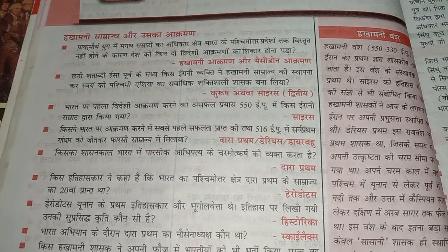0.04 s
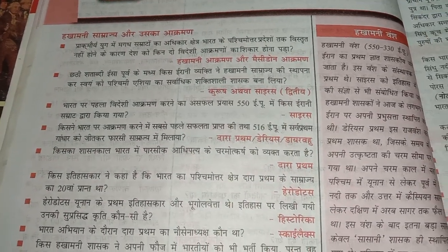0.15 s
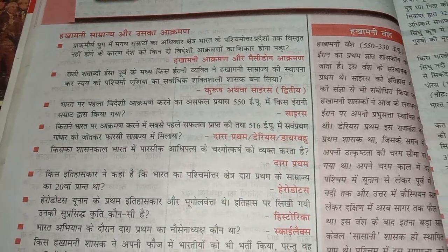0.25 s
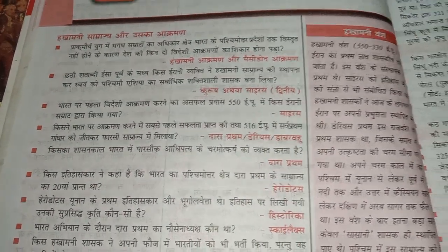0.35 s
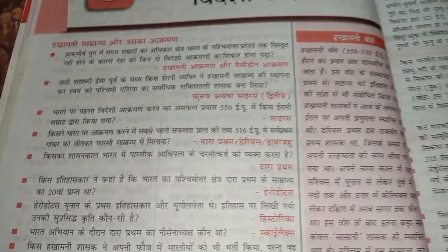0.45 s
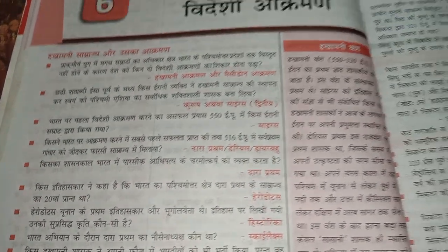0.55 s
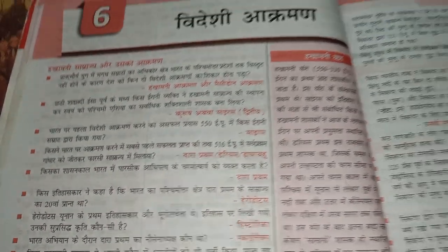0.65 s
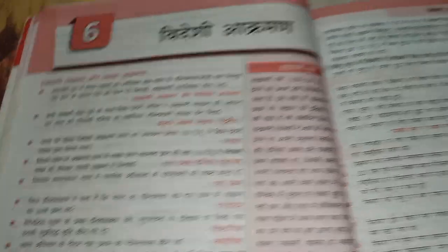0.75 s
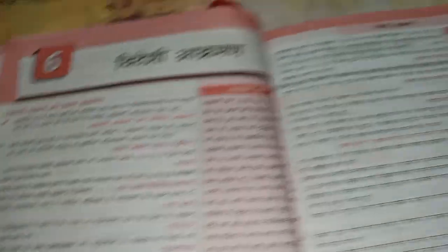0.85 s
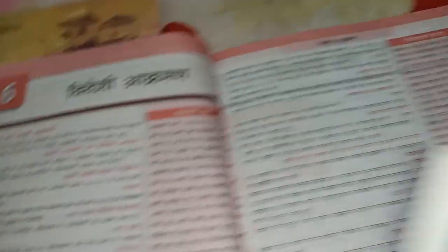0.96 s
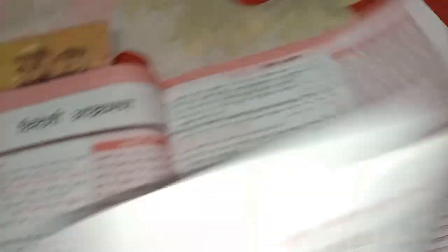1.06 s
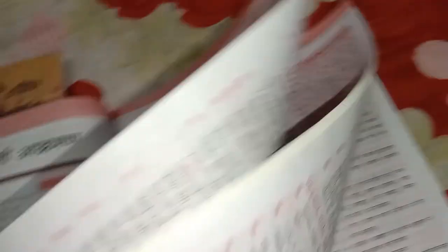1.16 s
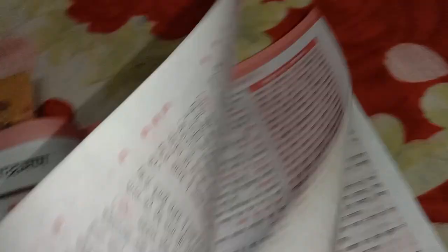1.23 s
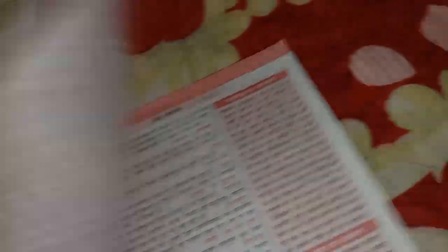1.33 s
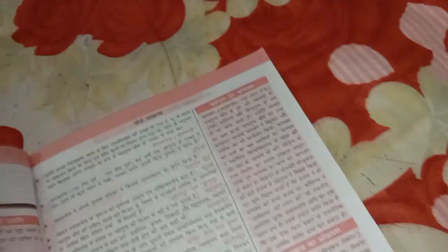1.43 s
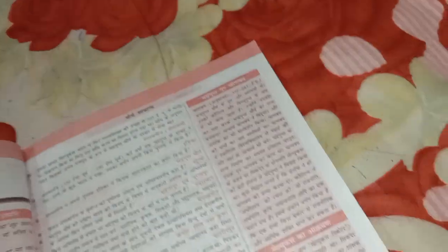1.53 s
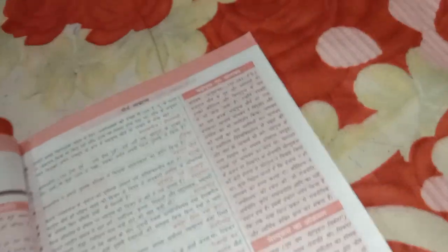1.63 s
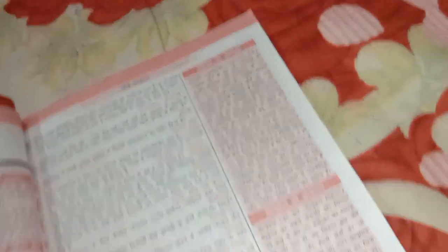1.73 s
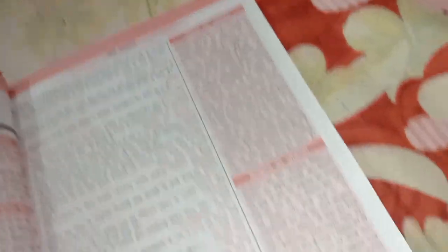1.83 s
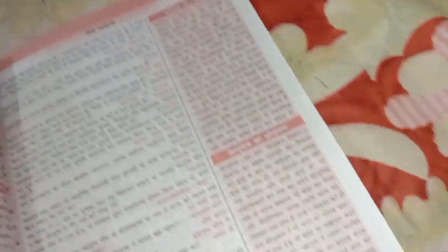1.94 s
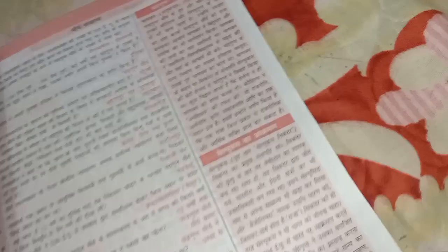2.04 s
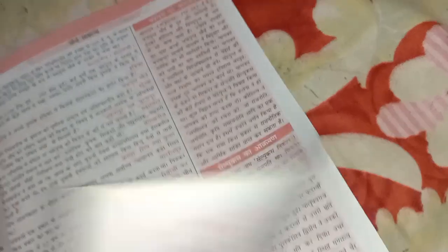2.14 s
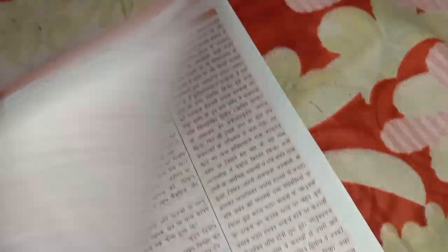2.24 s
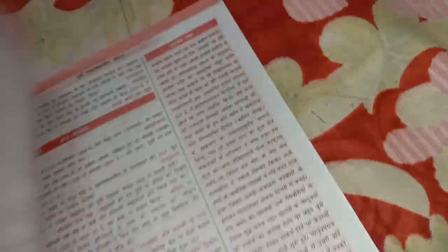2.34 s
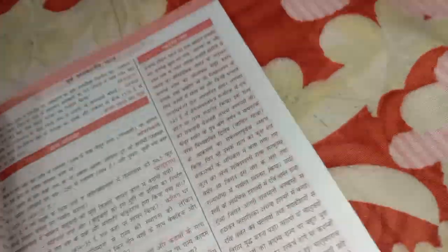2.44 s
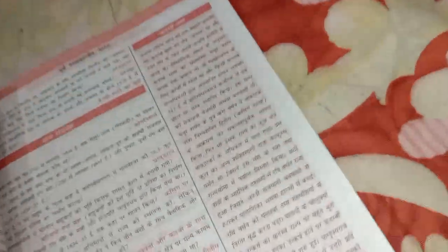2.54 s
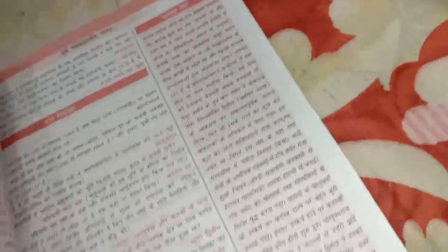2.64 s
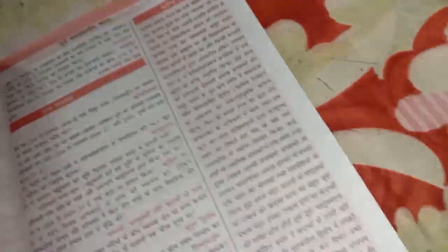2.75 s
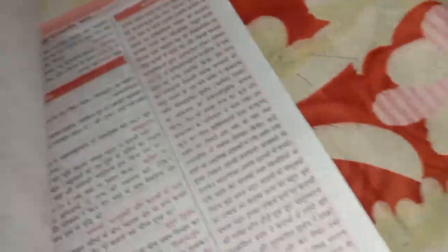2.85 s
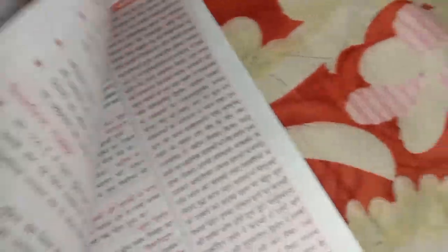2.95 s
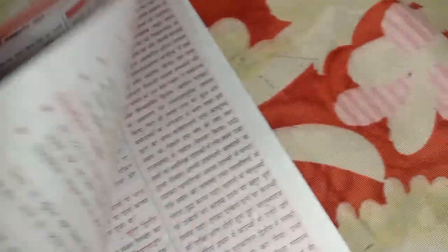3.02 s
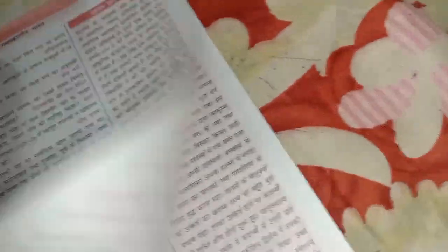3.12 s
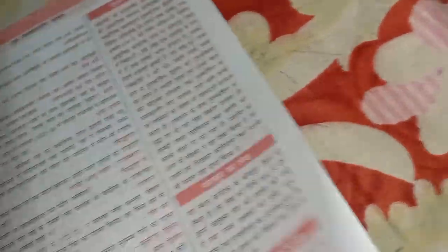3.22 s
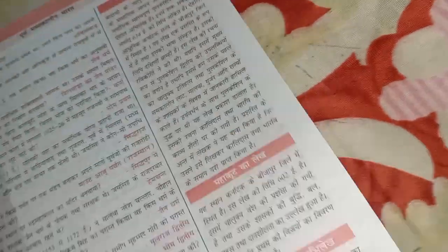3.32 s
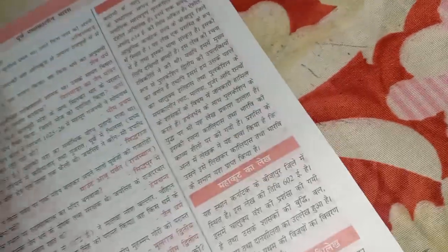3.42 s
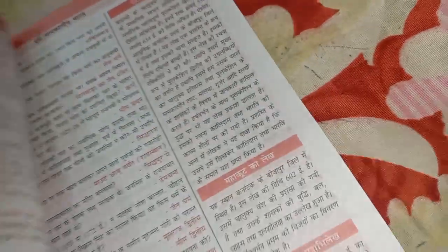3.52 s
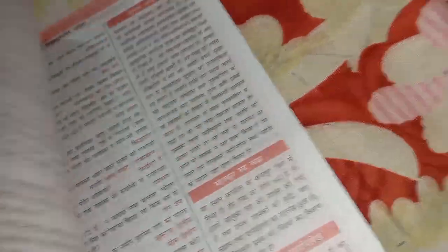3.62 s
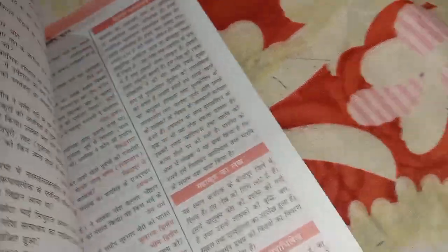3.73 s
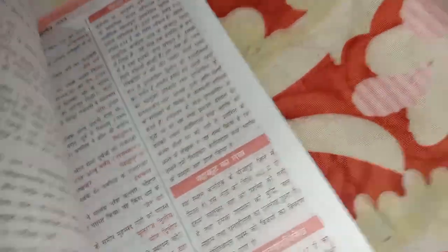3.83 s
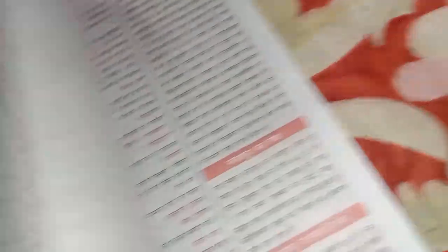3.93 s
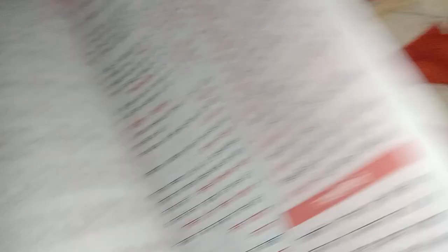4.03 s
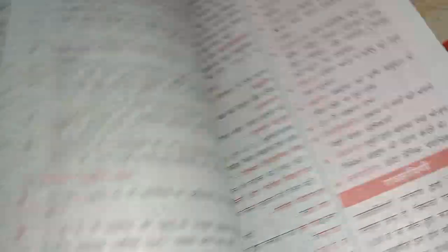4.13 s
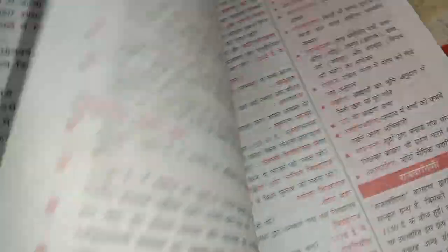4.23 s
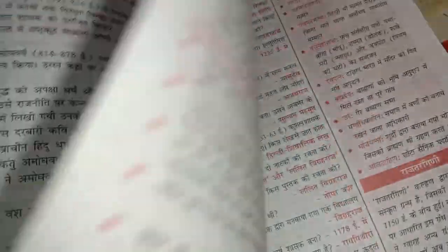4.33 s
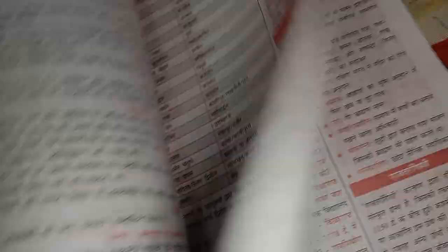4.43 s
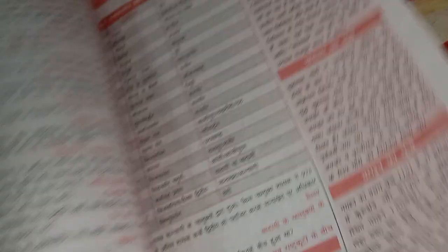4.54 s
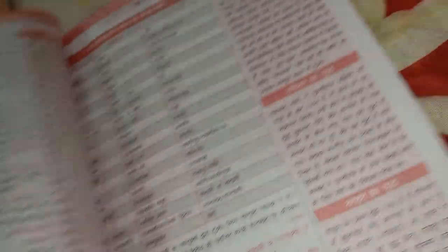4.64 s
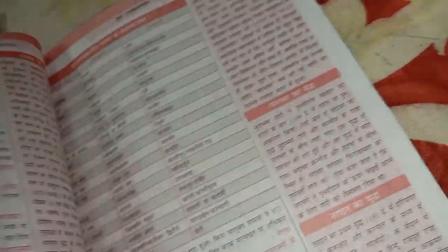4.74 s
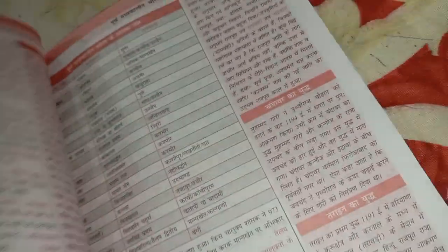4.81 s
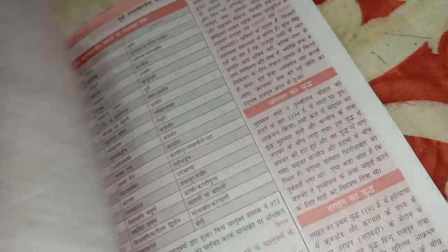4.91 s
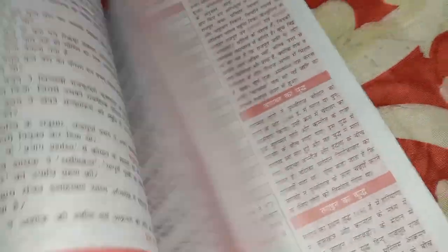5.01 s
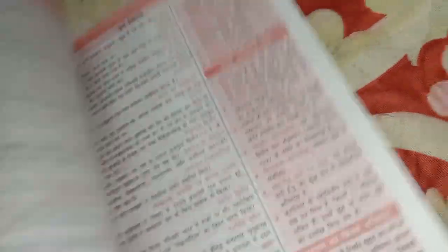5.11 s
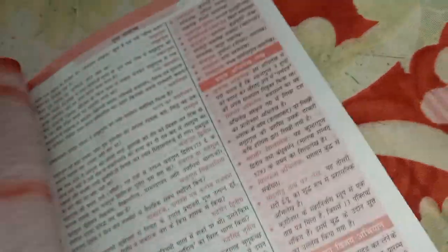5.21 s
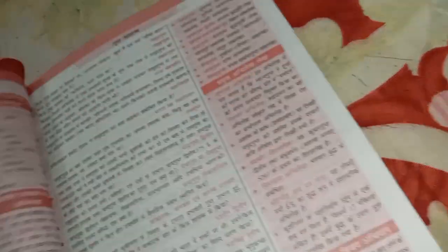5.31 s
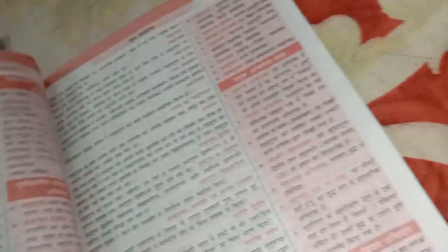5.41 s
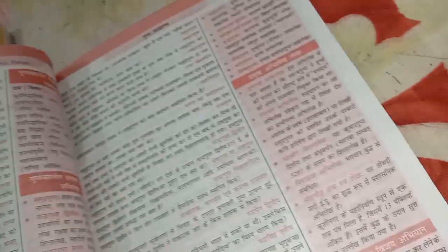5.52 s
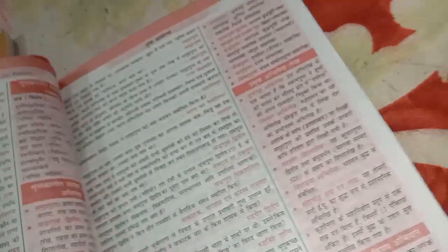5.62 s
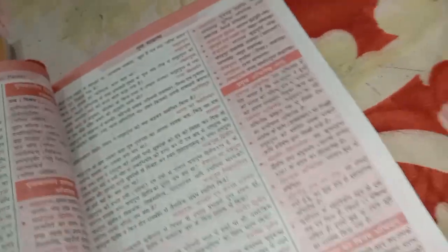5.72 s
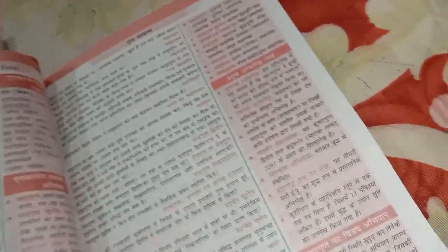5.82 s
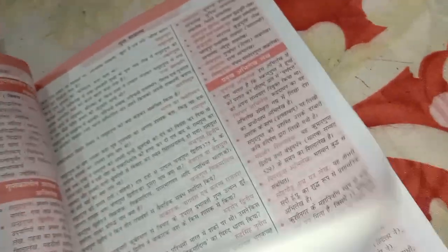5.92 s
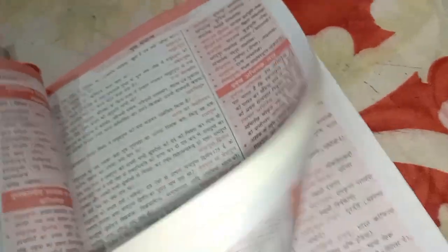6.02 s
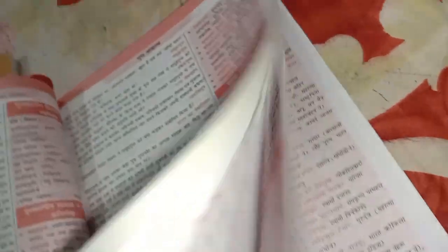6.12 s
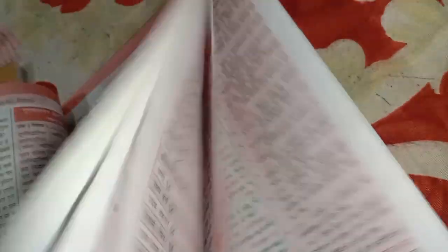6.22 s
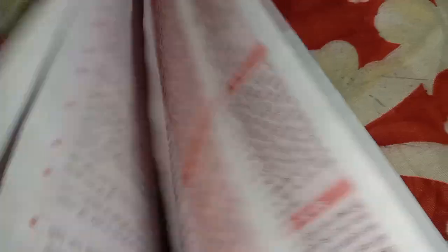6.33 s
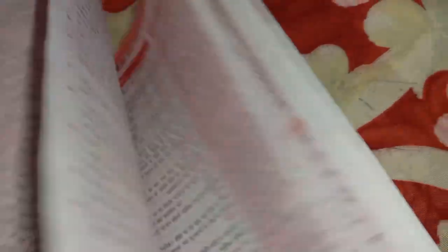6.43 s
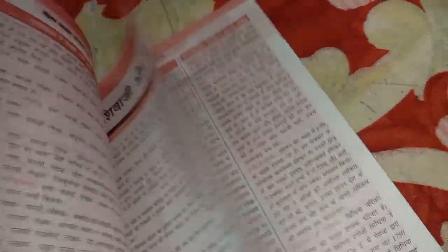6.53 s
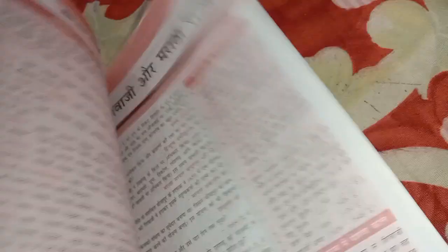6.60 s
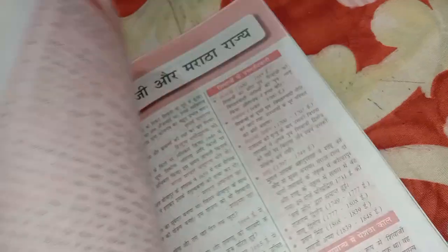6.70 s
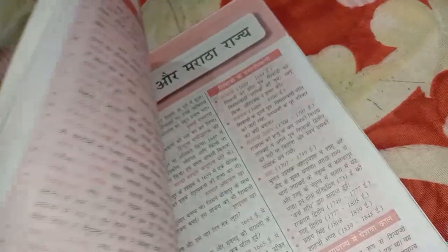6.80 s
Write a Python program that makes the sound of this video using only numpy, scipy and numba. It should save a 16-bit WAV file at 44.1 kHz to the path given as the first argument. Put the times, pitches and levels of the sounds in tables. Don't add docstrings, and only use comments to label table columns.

```python
import sys
import numpy as np
from scipy import signal
from scipy.fft import rfft, irfft
from scipy.io import wavfile
from numba import njit

SR = 44100
rng = np.random.default_rng(int(sys.argv[2]) if len(sys.argv) > 2 else 0)


def gain_from_decibels(decibels):
    exponent = np.asarray(decibels, float) / 20
    return 10 ** exponent


def wav_out(sig):
    wavfile.write(sys.argv[1], SR, np.round(np.clip(np.atleast_2d(sig).T, -1, 1) * 32767).astype(np.int16))


N = 302526

# [f/Hz, level/dB per Hz]
PAPER = [(40, -40), (120, -16), (470, -16), (940, -14), (1400, -8), (3750, -11), (4500, -17), (5500, -16),
         (6200, -24), (7100, -20), (8100, -37), (11400, -38), (13800, -47), (15000, -36)]
SWISH_RELEASE_DB_PER_S = 188


def rms_one(x):
    return x / np.sqrt(np.mean(x ** 2) + 1e-20)


def in_time(steps):
    return np.interp(np.arange(N) / SR * 1000, np.arange(len(steps)), steps)


def colour(x, spectrum, size=4096):
    hz, db = np.transpose(spectrum)
    grid = np.maximum(np.arange(size // 2 + 1) * SR / size, 1)
    cepstrum = irfft(np.log(gain_from_decibels(np.interp(np.log(grid), np.log(hz), db))))
    cepstrum[1:size // 2] *= 2
    cepstrum[size // 2 + 1:] = 0
    return signal.fftconvolve(x, irfft(np.exp(rfft(cepstrum))))[:len(x)]


def band(x, low_hz, high_hz, order=3):
    return signal.sosfilt(signal.butter(order, [low_hz, high_hz], "band", fs=SR, output="sos"), x)


def drift(rate):
    r = np.exp(-40 * np.pi * rate / SR)
    noise = rng.standard_normal(N // 20 + 2002)
    slow = signal.lfilter([1], [1, -2 * r, r * r], noise)[2000:]
    return np.interp(np.arange(N) / 20, np.arange(len(slow)), rms_one(slow))


def resonance(x, hz, width_hz):
    r = np.exp(-np.pi * width_hz / SR)
    turn = np.cos(2 * np.pi * hz / SR)
    return signal.lfilter(np.array([1, 0, -1]) * (1 - r * r) / 2, [1, -2 * r * turn, r * r], x)


@njit
def glide(x, turn, r):
    y = np.zeros(len(x))
    for i in range(2, len(x)):
        y[i] = (1 - r * r) / 2 * (x[i] - x[i - 2]) + 2 * r * turn[i] * y[i - 1] - r * r * y[i - 2]
    return y


def gestures(rows, attack_s, onset_db=4.5, start_db_per_s=117, release_db_per_s=179):
    start_s, length, db = np.transpose(rows)[:3, :, None]
    age = np.arange(N * 1000 // SR + 2) / 1000 - start_s
    climb = onset_db * np.maximum(1 - age / attack_s, 0) + start_db_per_s * np.maximum(-age, 0)
    sag = 7 * np.maximum(age, 0)
    release = release_db_per_s * np.maximum(age - length, 0)
    return age, db - climb - sag - release


def together(db):
    return in_time(np.sqrt(np.sum(gain_from_decibels(db) ** 2, axis=0)))


def fibres(per_s, spread_db, grain_db, flutter_db):
    sizes = gain_from_decibels(spread_db * np.minimum(rng.exponential(1, N), 3)) * rng.choice([-1, 1], N)
    born = rng.random(N) < per_s * gain_from_decibels(6 * drift(25)) / SR
    rub = rng.standard_normal(N) + gain_from_decibels(grain_db) * rms_one(sizes * born)
    return gain_from_decibels(flutter_db * drift(18.0)) * rub


def crinkles(per_s, cycles, spread_db):
    sizes = gain_from_decibels(spread_db * np.minimum(rng.exponential(1, N), 4)) * rng.choice([-1, 1], N)
    born = rng.random(N) < per_s / SR
    pitches, dealt = np.geomspace(1000, 14000, 22), rng.integers(0, 22, N)
    return rms_one(sum(np.sqrt(cycles) * resonance(sizes * born * (dealt == k) + 1e-18, hz, hz / cycles)
                       for k, hz in enumerate(pitches)))


def room(x, noise):
    t = np.arange(noise.shape[1]) / SR
    late = noise * np.minimum(t / 0.0085, 1) ** 2
    layers = [(0.2, 400, 1500), (0.11, 1500, 7200), (0.11, 7200, 7500)]
    tail = sum(band(late * gain_from_decibels(-60 * t / t60), low_hz, high_hz, order=1) for t60, low_hz, high_hz in layers)
    tail = tail / np.linalg.norm(tail, axis=1, keepdims=True)
    return gain_from_decibels(-12) * signal.fftconvolve(x, tail, axes=1)[:, :len(t)]


def quiet_room():
    # [f/Hz, level/dB per Hz]
    quiet_tone = [(24, -73), (50, 3), (140, -4.5), (180, -7), (402, -7), (491, -12.5), (1300, -16.5),
                  (1760, -15), (16000, -38.5)]
    return gain_from_decibels(-79.5) * rms_one(colour(rng.standard_normal(N), quiet_tone))


def bumps():
    # [t/s, peak level/dB, f/Hz, time to fade by 60 dB/s]
    bump_rows = [(0.207, -52.5, 109, 0.067), (0.371, -68, 100, 0.071), (0.534, -64, 107, 0.098),
                 (0.78, -54.5, 227.7, 0.34), (1.925, -53.5, 277, 0.26), (2.129, -60, 106, 0.12),
                 (2.175, -58, 100, 0.083), (2.24, -60, 111, 0.1), (2.392, -44, 430, 0.05),
                 (2.401, -40.5, 235, 0.32), (2.856, -41, 505, 0.015), (2.855, -50, 230, 0.018),
                 (3.005, -39, 466, 0.076), (3.03, -44, 330, 0.14), (3.042, -48, 503, 0.045),
                 (3.439, -55, 104, 0.12), (4.454, -51, 102, 0.09), (4.507, -57, 111, 0.33),
                 (4.589, -62, 91.7, 0.86), (5.752, -51, 566, 0.023), (5.761, -50.5, 186, 0.058),
                 (5.868, -57, 168, 0.065), (6.599, -58.5, 387, 0.98), (6.69, -49.5, 229, 0.079),
                 (6.76, -70, 375, 0.63), (.76, -60, 378, 0.045), (0.824, -49.5, 300, 0.021),
                 (1.008, -60.5, 340, 0.07), (3.029, -50, 152, .1), (1.155, -61, 430, 0.019)]
    out, t = np.zeros(N + 8192), np.arange(8192) / SR
    for start_s, db, hz, t60 in bump_rows:
        swell = 1 - np.exp(-t / .006)
        shape = swell * gain_from_decibels(-60 * (t / max(t60, .02)) ** 1.15)
        rough = rms_one(band(rng.standard_normal(8192), .6 * hz, 1.5 * hz, order=2))
        cycles = np.sin(2 * np.pi * hz * t) + hz / 700 * rough
        at = round(start_s * SR)
        out[at:at + 8192] += gain_from_decibels(db) * shape / shape.max() * cycles
    return out[:N]


def grip():
    # [t/s, length/s, rumble level/dB]
    grip_rows = [(.77, 0.086, -61), (1.23, 0.25, -60.5), (1.47, 0.068, -43), (1.6, 0.2, -60),
                 (1.92, 0.078, -60), (2.1, 0.12, -60), (2.35, 0.18, -51), (2.58, 0.32, -58),
                 (3.0, 0.083, -48.5), (3.15, 0.14, -63.5), (3.36, 0.1, -57), (3.62, 0.11, -51),
                 (4.05, 0.18, -69), (4.43, 0.68, -67), (4.75, 0.2, -66.5), (4.9, 0.039, -52),
                 (5.05, 0.28, -72), (5.38, 0.02, -53.5), (5.73, 0.22, -61.5), (6.19, 0.23, -61.5),
                 (6.5, 0.18, -69), (6.69, 0.019, -57.5)]
    rough = rng.standard_normal(N) * gain_from_decibels(3.7 * drift(51))
    rumble = rms_one(band(rough, 83.5, 178.5))
    return gain_from_decibels(-4.0) * together(gestures(grip_rows, attack_s=0.034)[1]) * rumble


def flaps():
    # [t/s, length/s, level/dB]
    flap_rows = [(.63, 0.56, -69), (1.15, 0.11, -51.5), (1.343, 0.12, -43.5), (1.42, 0.082, -39),
                 (1.58, 0.18, -60), (1.75, 0.26, -58.5), (1.92, 0.025, -56), (2.12, 0.22, -66.5),
                 (2.35, 0.14, -56), (2.58, 0.17, -48), (2.71, 0.26, -51.5), (3.005, 0.03, -57),
                 (3.12, 0.44, -58), (3.32, 0.42, -55.5), (3.66, 0.034, -40.5), (3.8, 0.4, -60.5),
                 (4.05, 0.22, -55), (4.4, 0.2, -61.5), (4.62, 0.1, -56.5), (4.77, 0.18, -55),
                 (4.918, 0.054, -45), (5.05, 0.21, -53.5), (5.28, 0.097, -49.5), (5.39, 0.037, -51),
                 (5.57, .1, -68.5), (5.68, 0.29, -55), (5.95, 0.072, -80), (6.105, 0.15, -58),
                 (6.28, 0.1, -49.5), (6.47, 0.057, -58), (6.58, 0.065, -67), (6.7, 0.046, -64.5)]
    level_db = gestures(flap_rows, attack_s=0.044, start_db_per_s=1198, release_db_per_s=171)[1]
    flutter = colour(fibres(per_s=92, spread_db=-8.0, grain_db=-15.5, flutter_db=4.5), PAPER)
    return together(level_db) * rms_one(band(flutter, 160, 954))


def slots():
    # [t/s, length/s, level/dB, start f/Hz, end f/Hz]
    slot_rows = [(1.08, 0.17, -51, 3700, 3100), (1.14, 0.15, -54, 1900, 1600), (2.70, .05, -50, 3800, 3470),
                 (2.75, 0.079, -40, 2900, 2180), (3.33, 0.11, -41.5, 3300, 3030),
                 (3.37, .12, -44, 1800, 1600), (3.52, 0.067, -43, 3300, 3820),
                 (3.96, 0.23, -55, 3600, 3360), (4.02, 0.064, -39.5, 2600, 1890),
                 (4.77, 0.045, -42, 2100, 2020), (4.99, 0.035, -48.5, 2500, 2220),
                 (5.185, 0.014, -42, 2500, 1940), (6.13, .05, -61, 3600, 3500),
                 (1.81, 0.031, -57, 2100, 1820), (6.71, 0.01, -53, 2400, 1970)]
    out, tail = np.zeros(N + SR), SR // 4
    _, level_db = gestures(slot_rows, attack_s=0.014, start_db_per_s=602,
                           release_db_per_s=SWISH_RELEASE_DB_PER_S)
    clock = np.arange(level_db.shape[1]) / 1000
    noise = gain_from_decibels(3.0 * drift(40)) * rng.standard_normal(N)
    for (start_s, length, _, start_hz, end_hz), db in zip(slot_rows, level_db):
        at = slice(round(start_s * SR) - tail, min(round((start_s + length) * SR) + tail, N))
        t = np.arange(at.start, at.stop) / SR
        hz = start_hz * (end_hz / start_hz) ** np.clip((t - start_s) / length, 0, 1.3)
        turn = np.cos(2 * np.pi * hz / SR)
        r = np.exp(-np.pi * 0.5 * end_hz / SR)
        ringing = glide(glide(noise[at], turn, r), turn, r)
        out[at] += gain_from_decibels(np.interp(t, clock, db)) * rms_one(ringing)
    return out[:N]


def sliding():
    # [t/s, length/s, rub level/dB,
    # tightness as fine hiss against the rub/dB, air gap at the start/octaves above closed]
    swish_rows = [(1.089, 0.1, -36.5, -12, 1.4), (1.338, 0.034, -45, -55, 0.16),
                  (1.425, 0.054, -33.5, -22.5, .8), (1.502, 0.058, -39, -7.5, 1.8),
                  (2.089, 0.12, -50, -20, 0.26), (2.37, 0.067, -43, -16, 0.49),
                  (2.695, 0.15, -37, -6.5, 1.37), (3.07, 0.16, -49.5, -7.5, 1.1),
                  (3.328, 0.2, -37, -9, 0.63), (3.938, 0.18, -36, -11.5, 0.77),
                  (4.754, 0.056, -42.5, -19, 2.1), (4.822, 0.044, -42.5, -12.5, 1.7),
                  (4.914, 0.085, -33, -22.5, 0.64), (5.052, 0.056, -36.5, -18, 0.73),
                  (5.177, 0.055, -43.5, -21, 3.6), (5.278, 0.07, -41, -38, 0.12),
                  (5.321, 0.12, -45.5, -20, 0.17), (6.124, 0.027, -48, -11, 0.77),
                  (6.587, 0.014, -49.5, -56, 0.44), (6.685, 0.013, -58.5, -63, 0.55)]
    # [t/s, length/s, rub level/dB, tightness/dB, air gap/octaves]
    drag_rows = [(0.602, 0.09, -64.5, -16, 0.47), (0.692, 0.21, -58.5, -12.5, 0.75),
                 (0.883, 0.17, -56.5, -14.5, 0.49), (1.59, 0.076, -43, -42, 0.5),
                 (1.753, 0.087, -40, -15.5, 0.55), (1.79, 0.21, -49, -12.5, 0.34),
                 (2.22, 0.71, -50.5, -13.5, 1.06), (2.53, 0.15, -57.5, -20, 0.86),
                 (2.842, 0.23, -47, -16.5, 0.59), (3.185, 0.18, -47, -25, 0.89),
                 (3.547, 0.12, -34, -12.5, 0.96), (3.726, 0.072, -44.5, -22, 0.37),
                 (3.771, 0.14, -45, -21.5, 0.45), (4.139, 0.16, -48.5, -15.5, 0.92),
                 (4.412, 0.091, -47.5, -12, 0.39), (4.54, 0.18, -45.5, -51, 0.42),
                 (4.608, 0.056, -45, -18, 0.36), (5.612, 0.14, -49, -15, 0.67),
                 (5.791, 0.15, -52, -17, 1.44), (5.97, 0.49, -58.5, -17, 0.96),
                 (6.216, 0.19, -51.5, -23, 1.3), (6.418, 0.11, -55, -22, 0.51), (6.55, .24, -93, 0, 1.1)]
    swish_attack_s, swish_onset_db = 0.034, 11.5
    swish = gestures(swish_rows, swish_attack_s, swish_onset_db, 1498, SWISH_RELEASE_DB_PER_S)
    drag = gestures(drag_rows, attack_s=0.061)
    age, rub_db = np.concatenate([swish, drag], axis=1)
    age = np.maximum(age, 0)
    _, length, _, tight_db, octaves = np.transpose(swish_rows + drag_rows)[:, :, None]
    whipped = (np.arange(len(age)) < len(swish_rows))[:, None]

    closing = np.exp(-(age / (0.85 * length + 0.014)) ** 2)
    gap_hz = 1600 * 2 ** (np.clip(octaves, -1, 2) * closing)
    weight = gain_from_decibels(rub_db) ** 2 + 1e-30
    weight = weight / weight.sum(axis=0)
    gap_hz = in_time(np.sum(weight * gap_hz, axis=0))
    gap_db = in_time(np.sum(weight * np.where(whipped, 6.5, 5.5), axis=0))

    bite_db = whipped * 0.071 * swish_onset_db * np.maximum(1 - age / swish_attack_s, 0)
    loosen_db_per_s = np.where(whipped, 54, 22.5)
    fine_db = tight_db + bite_db - loosen_db_per_s * age

    rub = rms_one(fibres(per_s=900, spread_db=3.5, grain_db=-5.0, flutter_db=1.4))
    rub = rub + gain_from_decibels(-10.5) * crinkles(per_s=1500, cycles=11.0, spread_db=3.5)
    gap_width_hz = 1340
    turn, r = np.cos(2 * np.pi * gap_hz / SR), np.exp(-np.pi * gap_width_hz / SR)
    gap = gain_from_decibels(gap_db) * glide(rub, turn, r)
    heard, sheet = colour(rub, PAPER), colour(rub + gap, PAPER)

    areas = np.geomspace(900, 4900, 7)
    body = rms_one(sum(gain_from_decibels(0.5 * drift(19)) * band(sheet, low, high, order=2) * (-1) ** k
                       for k, (low, high) in enumerate(zip(areas, areas[1:]))))
    sheen = rms_one(band(heard, 4400, 7900, order=4))
    edges = [7700, 9200, 11400, 13800, 16300]
    other = np.roll(heard, SR)
    fine = sum(gain_from_decibels(2.6 * drift(12)) * band(other, low, high) for low, high in zip(edges, edges[1:]))
    fine = rms_one(signal.sosfilt(signal.ellip(8, 1, 50, 15450, fs=SR, output="sos"), fine))

    sheen = together(rub_db + 0.38 * fine_db) * gain_from_decibels(1.3 * drift(12)) * sheen
    fine = together(rub_db + fine_db) * gain_from_decibels(-3.5) * gain_from_decibels(1.5 * drift(15)) * fine
    return gain_from_decibels(-4.5) * (together(rub_db) * body + sheen + fine)


def snaps():
    # [t/s, peak level/dB, sheet ring f/Hz, highs against peak/dB]
    crack_rows = [(1.417, -21.5, 1520, -34), (1.4347, -13.5, 1900, -2), (1.4512, -14.5, 1680, -22),
                  (1.745, -18.5, 2540, -12), (1.8019, -10, 1500, -15), (1.821, -20.5, 1820, -21),
                  (2.394, -24.5, 2230, 0), (2.412, -25, 2400, -5), (2.615, -32, 2180, -17),
                  (2.6718, -17.5, 3460, -10), (2.7226, -13.5, 2420, -1.5), (2.7373, -15.5, 3080, -2),
                  (2.7967, -24, 2450, -25), (3.022, -31.5, 1580, -12), (3.5857, -13.5, 2060, -11),
                  (4.1216, -21.5, 1570, -3.5), (4.8028, -26, 2270, 1), (4.925, -15.5, 3530, -6),
                  (4.974, -13, 2430, -14), (4.9847, -16.5, 3500, -6), (5.075, -13, 1760, -25),
                  (5.119, -30.5, 1560, -24), (5.153, -26.5, 1840, -31), (5.1835, -21, 2070, -5.5),
                  (5.23, -23, 1790, -10), (5.3512, -26, 1800, -2.5), (6.405, -39, 3630, -3),
                  (6.699, -23.5, 3380, -20)]
    # [t/s, peak level/dB, sheet ring f/Hz, highs against peak/dB]
    fold_rows = [(0.7424, -49.5, 1680, -13.5), (0.846, -40, 2120, -2), (1.4696, -21, 3080, -24),
                 (1.5022, -20, 1470, -33), (1.5069, -15, 3050, -32), (1.5678, -22.5, 1940, -28),
                 (1.7651, -33, 2900, -18), (1.4548, -26, 3660, -0.5), (2.858, -38, 2380, -26),
                 (2.9282, -30.5, 1720, -25), (3.0967, -25, 1760, -30), (3.3504, -21, 1310, -23),
                 (3.476, -30, 1600, -36), (3.538, -25, 3450, -34), (3.6603, -12.5, 2950, -18.5),
                 (3.7182, -42, 1480, -39), (4.4531, -35.5, 3140, -4), (4.789, -24, 2130, -10),
                 (4.9152, -20, 1860, -11), (4.945, -18, 4670, -11), (4.9546, -17, 3100, -9),
                 (5.0649, -22, 2370, -0.5), (5.2782, -16.5, 3200, -4.5), (6.135, -40, 3500, 1),
                 (6.1855, -43, 1400, -2), (6.232, -33, 1420, -32), (6.3166, -38, 1820, -36),
                 (6.36, -30, 1790, -25), (6.3769, -25.5, 4100, -8), (6.586, -30.5, 1630, -31)]
    # [t/s, peak level/dB, lows against peak/dB, highs against peak/dB]
    knock_rows = [(0.823, -37, -4.5, -28), (1.0072, -37, -5, -33), (1.259, -31, -2, -7.5),
                  (1.3508, -32, 1, -35), (1.3905, -32.5, -9, -32), (1.4468, -29, 1.5, -20),
                  (1.515, -28, -9, -4), (1.6317, -28, -16, -30), (1.929, -43, 11, -25),
                  (2.3216, -29.5, 0, -10), (2.347, -28, 3.5, -15), (2.458, -34.5, -3, -11),
                  (3.3164, -35, -0.5, -22), (3.809, -31, -1.5, -30), (3.841, -36, -6, -1),
                  (3.87, -30, -7.5, -28), (4.1578, -28, -20, -1), (4.6957, -27.5, -9.5, -5.5),
                  (4.8528, -31, -2, -25), (5.307, -38.5, 13.5, -37), (5.4044, -29, -7, -37),
                  (5.549, -47.5, 9, -31), (5.725, -35.5, -2.5, -5), (5.9103, -37.5, -4, -32),
                  (6.095, -48, 10.5, -25), (6.2809, -38.5, -3, -7), (6.291, -41, 3.5, -32),
                  (6.3871, -33.5, 1, -16), (6.4842, -21, -9, -23), (6.577, -48.5, 7.5, -33)]
    # [t/s, peak level/dB, sheet ring f/Hz, highs against peak/dB]
    tick_rows = [
        (1.838, -31.5, 2100, -20), (2.432, -34, 2300, -16), (2.526, -40, 1500, -30), (2.531, -40, 1700, -25),
        (5.266, -43, 1400, -23), (5.96, -41, 2510, -4), (6.25, -36, 3900, -10), (6.472, -48, 1490, -29),
        (6.5, -47, 2200, -25), (6.534, -44, 3000, -20), (6.595, -44, 3200, -16), (6.6, -42, 2900, -18),
        (6.703, -25.5, 2810, -33), (6.71, -28.5, 1510, -30), (6.716, -39, 3000, -21), (6.383, -33, 3400, -20),
        (6.412, -40, 3700, -12), (2.635, -31, 3000, -9), (1.372, -41, 3170, -25), (1.639, -33, 2400, -27),
        (1.675, -34, 2000, -27), (4.82, -36, 2400, -21), (4.885, -32, 3000, -20), (5.03, -42, 2500, -20),
        (5.205, -29, 1900, -25), (5.431, -33, 1900, -25), (5.332, -35, 1500, -25), (6.334, -42, 1500, -25),
        (1.16, -21.5, 3400, -6), (3.378, -26, 1900, -20), (5.2777, -21.5, 1290, -30), (5.187, -23.5, 3300, -3),
        (5.193, -23, 2400, -12), (5.2526, -36, 1400, -14), (5.3788, -31, 1300, -25), (5.411, -37, 3800, -14),
        (5.571, -45, 1300, -25), (5.819, -47, 1300, -25), (5.919, -40, 3220, -15), (5.928, -44, 1400, -20),
        (5.944, -43, 1400, -22), (6.157, -38.5, 1400, -12), (6.201, -37, 4500, -3.5), (6.309, -42, 1500, -18),
        (4.223, -37, 1340, -20), (4.7727, -33, 3100, -21), (4.794, -28, 2130, -15), (4.798, -39, 2000, -15),
        (4.937, -23, 1700, -18), (4.956, -29, 1300, -23), (1.8022, -19, 1450, -23), (3.863, -38, 2400, -15),
        (3.889, -45, 1800, -12), (3.588, -16, 1100, -18), (1.429, -32, 2300, -15)]
    # [t/s, peak level/dB, sheet ring f/Hz, highs against peak/dB]
    crumple_rows = [(1.444, -20.5, 1320, -12), (1.496, -19, 1350, -20), (1.518, -25.5, 1350, -22),
                    (1.533, -30, 2000, -17), (1.929, -36, 1310, -25), (2.918, -34, 1600, -25),
                    (3.087, -34, 1320, -27), (3.468, -28.5, 1600, -27), (3.717, -25.5, 1390, -31),
                    (6.18, -45, 1350, -20), (6.313, -39.5, 1410, -7), (6.404, -36, 3500, -8),
                    (6.59, -40.5, 2900, -12), (6.694, -30.5, 2800, -21), (6.707, -33, 1890, -23)]
    kinds = [(crack_rows, -24.5, 3.07, -4, 26), (fold_rows, -14.5, 4.54, 0.5, 26),
             (tick_rows, -14.5, 2, 0, 26), (crumple_rows, -9.5, 16.1, -2.5, 3.1)]
    rows = [(s, db, 1680, low_db, high_db, 6.9, -1.5, 26) for s, db, low_db, high_db in knock_rows]
    for kind, low_db, ms, room_db, rise in kinds:
        rows += [(s, db, hz, low_db, high_db, ms, room_db, rise) for s, db, hz, high_db in kind]
    start_s, db, ring_hz, low_db, high_db, ms, room_db, rise = np.transpose(rows)[:, :, None]

    noise = rng.standard_normal((len(rows), 8192))
    age = 1000 * np.arange(2048) / SR / ms
    burst = noise[:, -2048:] * (1 - np.exp(-rise * age)) * np.exp(-2.5 * age)
    burst[:, 4:5] += 13.2 / ms
    ring = []
    for one, hz in zip(burst, ring_hz[:, 0]):
        both = resonance(one, hz, .35 * hz) + .3 * resonance(one, hz, 1.2 * hz)
        ring.append(band(both, 1200, max(3700, 1.2 * hz), order=4))
    push = band(burst, 676, 1210, order=2) + 0.65 * band(burst, 397, 960, order=2)
    push = push + 0.17 * band(burst, 240, 480, order=2)
    crack = band(burst, 3600, 6000) + gain_from_decibels(1.3 * high_db - 1.5) * band(burst, 6400, 7500)
    top = band(burst, 8000, 15300, order=5)
    top_db = 3.6 * high_db - 17
    parts = [(np.array(ring), -1.5), (push, low_db - 0.5), (crack, high_db - 5.0), (top, top_db)]
    snap = gain_from_decibels(db) * sum(gain_from_decibels(d) * p / np.abs(p).max(axis=1, keepdims=True) for p, d in parts)

    heard = gain_from_decibels(room_db) * room(snap, noise)
    heard[:, :2048] += snap
    out = np.zeros(N + 8192)
    for at, one in zip(np.round(start_s[:, 0] * SR).astype(int), heard):
        out[at:at + 8192] += one
    return out[:N]


def scene():
    return (quiet_room() + bumps() + grip() + flaps() + slots() + sliding() + snaps())[None]


def band_limit(x):
    return signal.sosfilt(signal.butter(12, 16440, fs=SR, output="sos"), x)


def record(dry):
    dry = signal.sosfilt(signal.butter(2, 38, "high", fs=SR, output="sos"), dry)
    housed = dry + gain_from_decibels(8) * resonance(dry, hz=1268.4, width_hz=74)
    return band_limit(housed)


dry = scene()
out = record(dry)
wav_out(out)
```